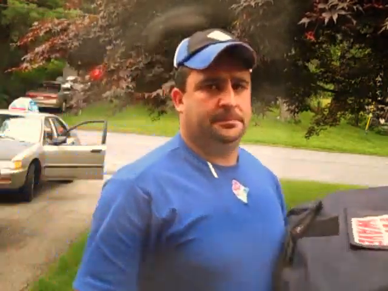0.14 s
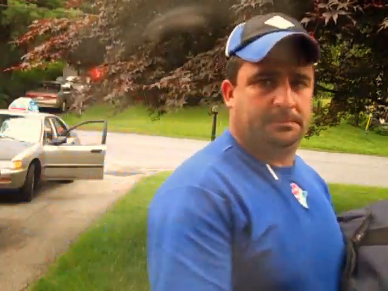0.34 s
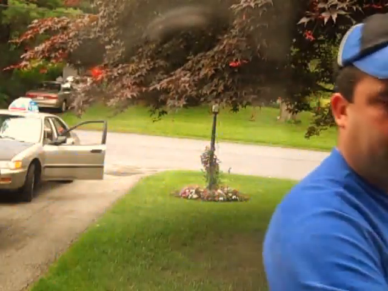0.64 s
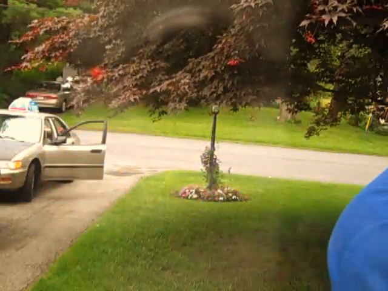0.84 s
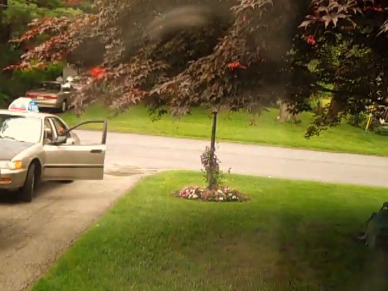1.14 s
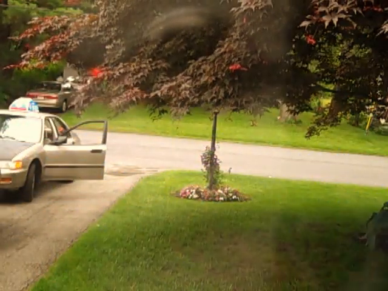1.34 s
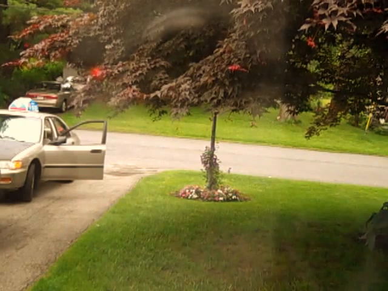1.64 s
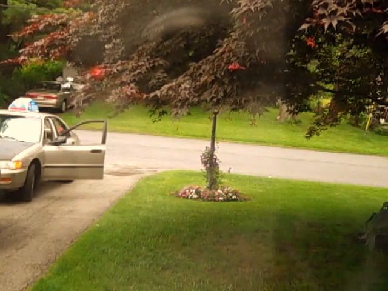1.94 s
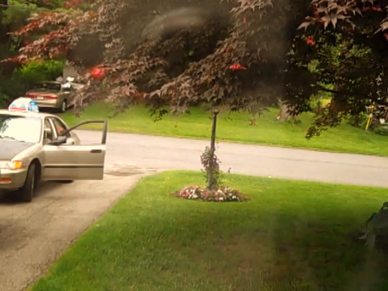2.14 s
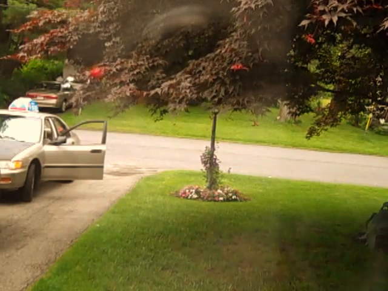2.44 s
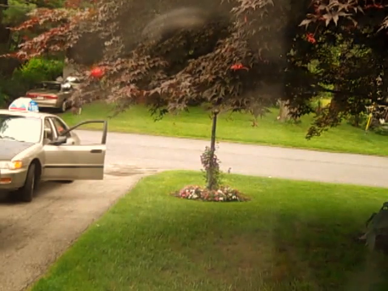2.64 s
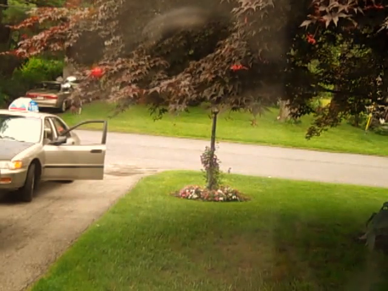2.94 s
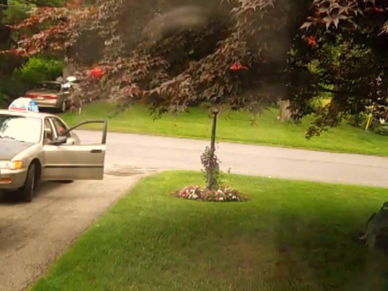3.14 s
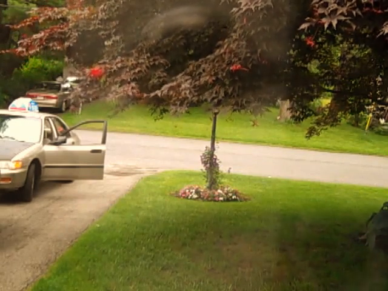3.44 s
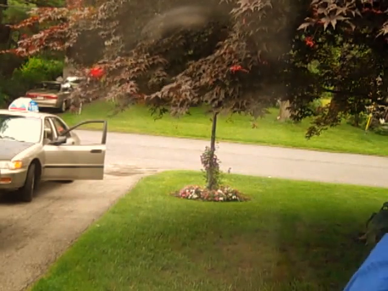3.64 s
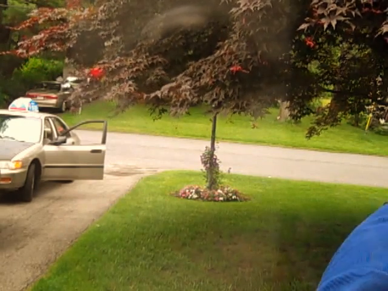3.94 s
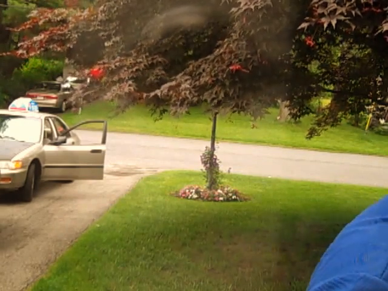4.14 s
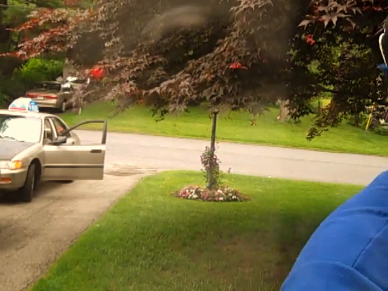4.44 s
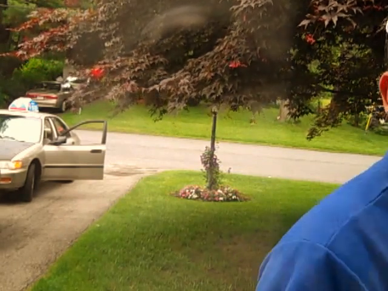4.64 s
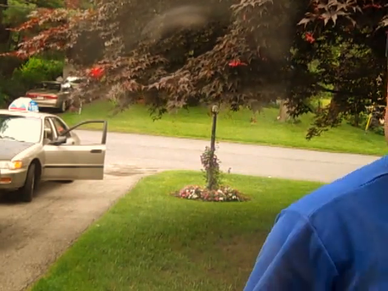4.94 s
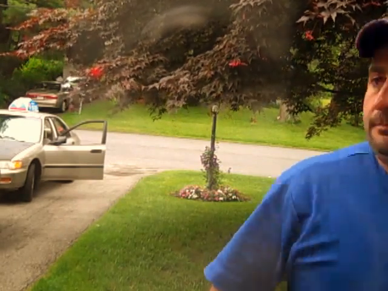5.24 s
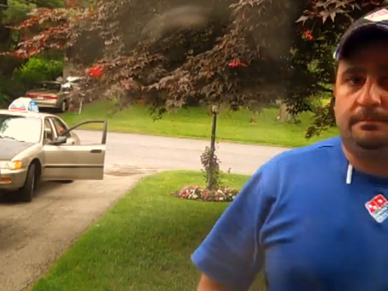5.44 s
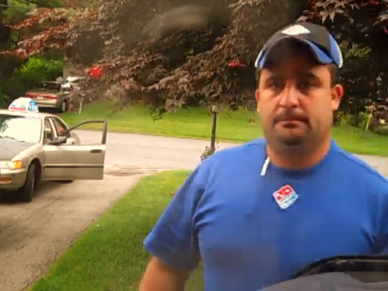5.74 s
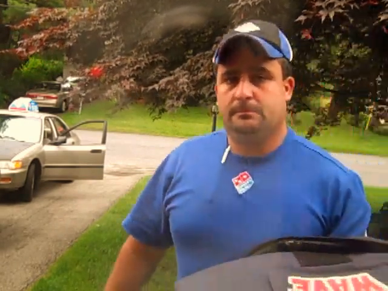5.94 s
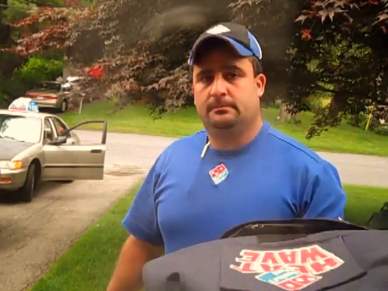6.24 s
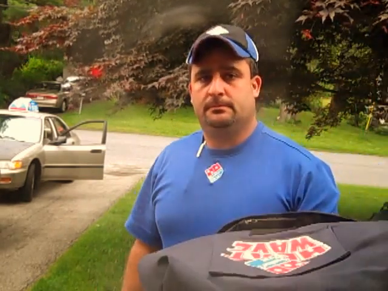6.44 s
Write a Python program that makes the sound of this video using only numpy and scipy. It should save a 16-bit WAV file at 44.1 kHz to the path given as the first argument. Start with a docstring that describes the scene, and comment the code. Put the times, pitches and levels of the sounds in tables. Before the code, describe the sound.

Inside a quiet house with low hum and faint hiss, a metal storm door is unlatched, pulled open and bumps in uneven clacks and rattles, with a jingling safety chain. After a brief settling, five evenly spaced knuckle raps hit the wooden door, loud and slightly clipped. Hum remains, then a faint bump and soft cloth brushes. The microphone sits close by, behind a front window.

```python
"""Heard from a camera behind the front window. Throughout: house hum and hiss, as shaped noise.
A metal storm door is unlatched, pulled open and let bump: decaying sines, low shaking noise, bright bursts.
Its safety chain jingles in rough resonant noise; five knuckle raps then ring the wooden door's modes.
Last come a faint bump and two cloth brushes, as soft noise.
The camera clips the loudest blows and turns its gain down after them."""
import sys
import numpy as np
from scipy import signal
from scipy.fft import rfft, irfft, next_fast_len
from scipy.io import wavfile
from scipy.ndimage import minimum_filter1d

SR = 44100
rng = np.random.default_rng(int(sys.argv[2]) if len(sys.argv) > 2 else 0)


def generate_wav(signal):
    """Clip the signal to [-1, 1] and save it as 16-bit WAV at the path in sys.argv[1]."""
    frames = np.transpose(np.atleast_2d(signal))
    scaled = np.clip(frames, -1, 1) * 32767
    pcm = np.round(scaled).astype(np.int16)
    wavfile.write(sys.argv[1], SR, pcm)


N = 290442
T = np.arange(SR // 3) / SR  # time axis of one event [s]
CREST_DB = 8  # allowance for a noise burst's peak over its rms


def amp(db):
    """Amplitude ratio of a level in dB."""
    return 10 ** (np.asarray(db) / 20)


def unit(x):
    """x scaled to rms 1."""
    return x / np.sqrt(np.mean(x ** 2) + 1e-20)


def along(points, hz):
    """Interpolates (frequency [Hz], value) points on a log frequency axis."""
    f, v = np.transpose(points)
    return np.interp(np.log(hz + 1), np.log(f + 1), v)


def filtered(x, response):
    """x times a zero-phase response of frequency."""
    m = next_fast_len(x.shape[-1] + 4096)
    spectrum = rfft(x, m) * response(np.fft.rfftfreq(m, 1 / SR))
    return irfft(spectrum, m)[..., :x.shape[-1]]


def peaks(table, hz):
    """Amplitude gain of (frequency [Hz], width [Hz], level [dB]) resonances, summed in power."""
    return np.sqrt(sum(amp(db) ** 2 / (1 + (2 * (hz - c) / w) ** 2) for c, w, db in table))


def pair(size, gain, alike):
    """Stereo noise of rms 1; alike is the left-right correlation, a number or (Hz, value) points."""
    def turn(hz):
        likeness = along(alike, hz) if np.ndim(alike) else alike + 0 * hz
        return np.arccos(np.clip(likeness, -1, 1)) / 2

    noise = rng.standard_normal((2, size))
    mid, side = filtered(noise, lambda hz: gain(hz) * [np.cos(turn(hz)), np.sin(turn(hz))])
    return unit(np.array([mid + side, mid - side]))


def add(track, s, sound):
    """Mixes a sound in at time s."""
    part = track[:, round(s * SR):][:, :sound.shape[-1]]
    part += sound[..., :part.shape[1]]


def fade(t60, attack):
    """Exponential decay, 60 dB in t60 seconds, with an exponential onset of time constant attack [s]."""
    return amp(-60 * T / t60) * (1 - np.exp(-T / attack))


def chatter(rate_hz, depth_db):
    """Loose parts touch at random, rate_hz on average: sudden loudness jumps that die away."""
    touches = rng.random(len(T)) < rate_hz / SR
    kicks = touches * np.minimum(.6 * amp(depth_db * rng.standard_normal(len(T))), 1)
    return 1 + signal.lfilter([1], [1, -np.exp(-2 * rate_hz / SR)], kicks)


# hallway decay: (frequency [Hz], t60 [s])
HALL_T60 = [(100, 0.4), (500, 0.063), (3000, 0.07), (10000, 0.018)]


def hall(x):
    """Adds the hallway's answer: each frequency dies at its own speed, the bass is alike on both sides."""
    hz, t, z = signal.stft(rng.standard_normal((2, SR // 4)), SR, nperseg=256)
    apart = np.clip(hz / 1200, .25, 1)[:, None]
    z = np.array([z[0] + apart * z[1], z[0] - apart * z[1]]) / np.sqrt(1 + apart ** 2)
    decay = amp(-60 * t / along(HALL_T60, hz)[:, None])
    tail = signal.istft(z * decay, SR, nperseg=256)[1]
    delayed = np.pad(x, ((0, 0), (300, 0)))  # samples
    wet = signal.fftconvolve(delayed, tail / np.linalg.norm(tail[0]), axes=1)
    return x + amp(-15.5) * wet[:, :len(T)]


# house noise spectrum, shape only: (frequency [Hz], relative density [dB per Hz])
HOUSE_SPECTRUM = [(12, -34.5), (20, -5), (49, -15), (140, -3.5), (161, -15.5), (282, -18), (315, -23),
                  (352, -18), (404, -20.5), (649, -24.5), (1160, -24.5), (1720, -30), (6910, -35),
                  (13900, -47.5), (15500, -82)]
# hum bands added to it: (frequency [Hz], width [Hz], level over the spectrum [dB])
HUM_BANDS = [(141.8, 2.2, 13), (75, 7.3, 10), (100, 4.5, 2.5), (58, 9.9, 3), (415, 11, 8), (744, 17, -0.5),
             (824, 32, 3.5), (840, 37, -1), (1189, 26, 8.5), (1540, 13, 4), (7740, 1600, 0.5)]
# (frequency [Hz], left-right correlation [-1..1])
HOUSE_ALIKE = [(60, 0.92), (180, 0.88), (550, 0.73), (1650, 0.45), (4970, -0.093), (15000, -0.15)]
HOUSE_RMS_DB = -49


def house():
    """Appliance hum in the room's resonances, over hiss: stationary noise with narrow bands."""
    spectrum = lambda hz: amp(along(HOUSE_SPECTRUM, hz)) * (1 + peaks(HUM_BANDS, hz))
    return amp(HOUSE_RMS_DB) * pair(N, spectrum, HOUSE_ALIKE)


# dull knocks, mostly the leaf bumping its frame: (time [s], level [dB], pitch [Hz], t60 [s])
LEAF_BUMPS = [(.185, -42.5, 283, 0.069), (.247, -38, 470, 0.031), (1.235, -20, 367.7, 0.2),
              (1.441, -12, 425, 0.043), (1.516, -7, 64.4, 0.1), (2.606, -1.5, 402, 0.063),
              (2.608, -13.5, 127.4, 0.16), (2.633, -15.5, 190.4, 0.043), (5.712, -48.5, 466, 0.11)]
# jolts of the moving door shake wall and window:
# (time of peak [s], boom level [dB], shudder level [dB], swell [dB/s])
DOOR_JOLTS = [(1.151, -30, -36, 357), (1.451, -24.5, -37, 252.5), (1.528, -24, -30.5, 254.5),
              (1.64, -40.5, -44.5, 257.5), (1.84, -53.5, -47.5, 96), (2.378, -28.5, -32, 220),
              (2.612, -15.5, -42.5, 1198.5), (2.729, -23.5, -33, 144), (2.85, -34, -50.5, 200),
              (3.07, -37.5, -41.5, 154), (3.2, -43, -45, 147.5), (3.31, -43, -56, 141),
              (3.44, -43, -58, 250)]
# shapes of the two shakes: (frequency [Hz], relative density [dB per Hz])
BOOM_SPECTRUM = [(12, -37.5), (20, -10), (49, -11.5), (64, -4.5), (137, -10.5), (200, -27.5), (260, -53.5),
                 (440, -120)]
SHUDDER_SPECTRUM = [(110, -50.5), (180, -12.5), (441, -8), (550, -11.5), (634, -22), (725, -15),
                    (1410, -30), (1500, -22.5), (1950, -47), (3300, -120)]
BOOM_FALL_DB_S, SHUDDER_FALL_DB_S = 109, 150


def storm_door():
    """Decaying sine bumps, and low shaking noise that swells up to each jolt and dies after it."""
    s, boom_db, shudder_db, swell_db_s = np.transpose(DOOR_JOLTS)[..., None]
    after = np.arange(N) / SR - s

    def level(db, fall_db_s):
        return np.linalg.norm(amp(db + np.minimum(swell_db_s * after, -fall_db_s * after)), axis=0)

    boom = pair(N, lambda hz: amp(along(BOOM_SPECTRUM, hz)), [(30, 0.61), (80, 0.91)])
    shudder = pair(N, lambda hz: amp(along(SHUDDER_SPECTRUM, hz)), 0.93)
    out = level(boom_db, BOOM_FALL_DB_S) * boom + level(shudder_db, SHUDDER_FALL_DB_S) * shudder
    for s, db, hz, t60 in LEAF_BUMPS:
        add(out, s, amp(db) * np.sin(2 * np.pi * hz * T)[None] * fade(t60, 0.00087))
    return out


# latch and frame contacts: (time [s], nominal snap peak [dB], low mids over snap [dB],
# body over low mids [dB], mid ring [Hz], snap ring [Hz], t60 before limiting [s])
CONTACTS = [(0.644, -38, -35, -10, 3140, 8360, 0.17), (0.7895, -49, -17.5, 6, 1390, 6800, 0.29),
            (1.092, -49.5, 0.5, -12, 1000, 7700, 0.68), (1.1366, -26.5, -1, 6, 1480, 8460, 0.2),
            (1.219, -32, -2.5, 9, 2750, 6030, 0.13), (1.2337, -19.5, -1.5, -1.5, 1090, 7690, 0.16),
            (1.2943, -36.5, -5, -10, 3180, 7800, 0.16), (1.3615, -29.5, -1.5, 4, 2900, 8300, 0.16),
            (1.4181, -26.5, -12.5, 5, 2600, 8060, 0.39), (1.441, -16.5, -11.5, 2.5, 3140, 6230, 0.17),
            (1.462, -14, -3, 4, 1980, 5580, 0.12), (1.698, -33.5, -13, 13.5, 3620, 6750, 0.18),
            (2.3298, -39.5, 9.5, 9, 1290, 7220, 0.26), (2.3651, -37, -7.5, 7, 2830, 7900, 0.34),
            (2.4146, -33.5, -11.5, -6, 1030, 7770, 0.18), (2.5114, -47, -0.5, 10.5, 1010, 7660, 0.84),
            (2.6062, -31, 21.5, 5.5, 1300, 7710, 0.09), (2.6311, -17, -7, 0.5, 3760, 6000, 0.17),
            (2.7509, -19, 2.5, 1.5, 1560, 7020, 0.12), (2.902, -56.5, 13, -4, 1474, 6750, 0.15),
            (2.9824, -55.5, 7.5, 1, 3060, 6260, 0.47), (3.032, -40.5, 3, -2, 1370, 6450, 0.33),
            (3.0754, -30.5, -6, 6.5, 1210, 7500, 0.24), (3.133, -12.5, -7.5, -5.5, 1510, 6600, 0.14),
            (3.2256, -39.5, -3.5, -4, 1370, 6700, 0.35), (3.266, -34, -9.5, -4.5, 1600, 8200, 0.13),
            (3.3432, -36, -6.5, 3, 1170, 8100, 0.15), (3.398, -54, 10.5, 10, 1250, 6420, 0.21),
            (3.423, -37.5, -4.5, -13, 1000, 7950, 0.12), (3.467, -35, -8.5, -8, 1180, 8100, 0.14),
            (4.4251, -51, -12, 15, 1030, 7810, 0.22)]
# storm door sheet metal: (frequency [Hz], width [Hz], mean level [dB])
SHEET_MODES = [(364, 12, 14.5), (422, 13, 3), (560, 47, -1), (796, 37, 1), (1000, 47, -3), (1250, 40, 2.5),
               (1570, 14, 4), (2110, 230, -2.5), (3180, 50, 0), (3760, 240, -1.5), (4870, 90, -6),
               (6450, 130, -24), (8200, 290, 2), (10300, 110, -13)]
# crack of a contact, also used by chain and raps: (frequency [Hz], relative density [dB per Hz])
CRACK_SPECTRUM = [(2350, -10), (4000, -6.5), (5190, -9.5), (6510, -1.5), (12200, -17.5), (13500, -17.5),
                  (14500, -43), (15500, -105)]
# slow modes of the metal frame, gain squared in use: (frequency [Hz], width [Hz], level [dB])
FRAME_MODES = [(1660, 73, 1), (3380, 220, -2.5)]
UPPER_DB = -3  # upper mids over the mean of snap and low mids
HIGH_RING_DB = 7  # upper mids' further gain where the mid ring is high
AIR_LIFT_DB = -3  # the snap's top octave
LATCH_PAN_DB = 1.3  # left over right


def latch():
    """Each contact is a snap and a rattle through randomly varied sheet modes plus its own two rings."""
    out = np.zeros((2, N))
    slope = lambda hz, lo, hi: 1 / np.sqrt((1 + (lo / (hz + 1)) ** 10) * (1 + (hz / hi) ** 10))  # band-pass
    for s, snap_db, weight_db, body_db, ring_hz, snap_hz, t60 in CONTACTS:
        lower_db = snap_db + weight_db
        upper_db = snap_db + weight_db / 2 + UPPER_DB + HIGH_RING_DB * slope(ring_hz, 1900, 9000)
        struck = [(hz, width, db + rng.normal(0, 5.5)) for hz, width, db in SHEET_MODES]
        struck += [(ring_hz, 70, 6), (snap_hz, 250, 5)]

        def band(db, shape, alike):
            crack = lambda hz: amp(along(CRACK_SPECTRUM, np.maximum(hz, 4500)))
            sheet = lambda hz: (peaks(struck, hz) + amp(-3)) * crack(hz)
            return amp(db - CREST_DB) * pair(len(T), lambda hz: sheet(hz) * shape(hz), alike)

        air = lambda hz: amp(AIR_LIFT_DB) * slope(hz, 10500, 16000)
        snap = band(snap_db, lambda hz: slope(hz, 3700, 9500) + air(hz), .05)
        upper = band(upper_db, lambda hz: slope(hz, 2000, 4300), .3)
        lower = band(lower_db, lambda hz: slope(hz, 750, 1800), 1.0)
        body = band(lower_db + body_db, lambda hz: slope(hz, 250, 720), 1.0)
        linger = amp(lower_db - 25.5) * pair(len(T), lambda hz: peaks(FRAME_MODES, hz) ** 2, 0.59)

        t60 = np.clip(t60, .03, .45)
        burst = (snap + upper + lower) * chatter(170, depth_db=1.5)
        burst *= fade(t60, 0.00082) + .6 * fade(0.036, 0.00046)
        burst += body * chatter(64, depth_db=6.5) * fade(1.21 * t60, 0.00068)
        burst += linger * fade(0.48, .004)
        add(out, s, hall(burst * amp([[LATCH_PAN_DB / 2], [-LATCH_PAN_DB / 2]])))
    return out


# chain links: (time [s], nominal peak [dB], t60 [s])
LINK_JINGLES = [(1.5457, -25, 0.17), (1.6296, -21.5, 0.13), (1.7067, -24, 0.082), (1.7644, -32.5, 0.13),
                (1.8115, -39, 0.17), (2.7185, -22, 0.22), (2.7894, -30, 0.13)]
# chain steel, gain squared in use: (frequency [Hz], width [Hz], mean level [dB])
CHAIN_MODES = [(4750, 200, -3.5), (5050, 240, -1.5), (6950, 110, 0), (7500, 130, -1.5), (7920, 120, -4.5),
               (8670, 160, -2), (9750, 150, -9.5), (10600, 150, -21)]


def chain():
    """Links chatter against each other: a rough ring in the steel's resonances."""
    out = np.zeros((2, N))
    pan_db = np.array([[1.5], [-1.5]])
    for s, db, t60 in LINK_JINGLES:
        struck = [(hz, width, level + rng.normal(0, 3.3)) for hz, width, level in CHAIN_MODES]
        crack = lambda hz: amp(-12.5) * amp(along(CRACK_SPECTRUM, hz))
        ring = pair(len(T), lambda hz: peaks(struck, hz) ** 2 + crack(hz), 0.091)
        envelope = fade(t60, 0.0034) + 0.25 * fade(0.026, .0006)
        add(out, s, hall(amp(db - CREST_DB + pan_db) * ring * chatter(100, depth_db=8.0) * envelope))
    return out


# knuckle raps: (time [s], wood gain [dB], crack level [dB])
KNUCKLE_RAPS = [(3.7666, 5, -23.5), (3.9625, 7, -16), (4.148, 5, -21.5), (4.3094, 4.5, -19),
                (4.4811, 4, -21)]
# wooden door's low modes: (frequency [Hz], mean level [dB], t60 [s], direction of first swing [+1/-1])
DOOR_MODES = [(50.3, -24, 0.33, 1), (95.6, -8, 0.12, 1), (108, -13, 0.073, 1), (123.3, -22, 0.43, 1),
              (153, -17.5, 0.068, 1), (199, -32, 0.15, -1), (248, -11.5, 0.034, -1), (293.6, -12.5, 0.1, 1),
              (357, -31.5, 0.19, -1), (392, -2, 0.046, 1), (424, -45, 0.111, 1), (487, -35, 0.2, 1),
              (528, -39, 0.17, 1), (632, -15.5, 0.037, 1), (703, -34, 0.29, -1), (866, -30, .15, 1)]
# its dense upper modes, shape only: (frequency [Hz], relative density [dB per Hz])
PANEL_SPECTRUM = [(88, -38), (150, -8), (214, -16.5), (449, -6), (580, -9.5), (851, -11), (1440, -33.5),
                  (2890, -46), (4500, -36), (5850, -71.5), (9900, -120)]


def raps():
    """A push of about 1 ms: low modes start together, dense upper ones blur, glass and latch buzz."""
    out, push = np.zeros((2, N)), np.hanning(round(.0016 * SR))
    modes = np.array([np.sign(way) * amp(-60 * T / t60) * np.cos(2 * np.pi * hz * T)
                      for hz, _, t60, way in DOOR_MODES])
    for s, db, crack_db in KNUCKLE_RAPS:
        # level varies per rap, and per side
        ring_db = np.array([level + rng.normal(0, 0.7) + rng.normal(0, 3.0, 2)
                            for _, level, _, _ in DOOR_MODES])
        wood = signal.fftconvolve(amp(ring_db).T @ modes, push[None] / push.sum(), axes=1)[:, :len(T)]
        panel = pair(len(T), lambda hz: amp(along(PANEL_SPECTRUM, hz)), 1.0)
        wood += amp(-17.5) * panel * fade(0.12, 0.00073)
        buzz = pair(len(T), lambda hz: amp(along(CRACK_SPECTRUM, hz)) / (1 + (hz / 11500) ** 6), 0.15)
        buzz *= fade(0.045, 0.0021) + amp(-7.5) * fade(0.16, 0.0034)
        add(out, s, hall(amp(db) * wood + amp(crack_db) * buzz))
    return out


# cloth near the camera: (time [s], level [dB], half length to 1/e [s])
CLOTH_BRUSHES = [(6.207, -56.5, 0.0071), (6.236, -49.5, 0.023)]


def cloth():
    """Two soft brushes of fabric: band noise under Gaussian swells."""
    t = np.arange(N) / SR
    swell = sum(amp(db) * np.exp(-((t - s) / half_s) ** 2) for s, db, half_s in CLOTH_BRUSHES)
    return swell * pair(N, lambda hz: peaks([(6650, 3000, 0)], hz) ** 2, .1)


def scene():
    """Door sounds reach the left side later, the doorway being to the right; house and cloth do not shift."""
    left, right = raps() + latch() + chain() + storm_door()
    lag_samples = 4
    return np.array([np.roll(left, lag_samples), right]) + house() + cloth()


def gain_control(x, limit_db, most_db, hold_s, attack_s, release_db_s):
    """Peaks over the limit pull the gain down; it holds, then climbs back at a steady rate."""
    over = np.clip(20 * np.log10(np.abs(x).max(axis=0) + 1e-9) - limit_db, 0, most_db)
    hold = round(hold_s * SR)
    lowest = minimum_filter1d(np.pad(-over, (hold, hold)), 2 * (hold // 2) + 1)
    held = -lowest[hold - hold // 2:][:N]  # maximum over the past hold time
    slope = release_db_s * np.arange(N) / SR
    cut_db = np.maximum.accumulate(held + slope) - slope
    keep = np.exp(-1 / (attack_s * SR))
    return x * amp(-signal.lfilter([1 - keep], [1, -keep], cut_db))


# left converter wraps round to the negative rail: (time [s], length [s])
WRAPS = [(3.7747, .0008), (3.9709, .0005)]
TOP_HZ = 16600


def record(dry):
    """Gain control, clipping at the converter, and the band limit with little left near its edge."""
    x = gain_control(dry, limit_db=-3.0, most_db=14, hold_s=0.25, attack_s=0.046, release_db_s=50)
    top = .51  # clipping amplitude
    x = x / (1 + np.abs(x / top) ** 12) ** (1 / 12)
    for s, length_s in WRAPS:
        x[0, round(s * SR):round((s + length_s) * SR)] = -top
    return filtered(x, lambda hz: (hz < TOP_HZ) * amp(-19 * np.clip((hz - 14000) / 400, 0, 1)))


dry = scene()
out = record(dry)
generate_wav(out)
```